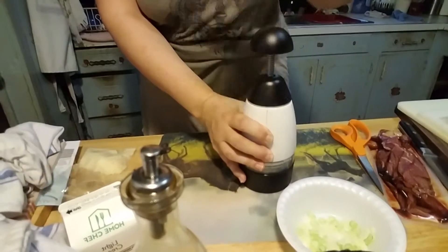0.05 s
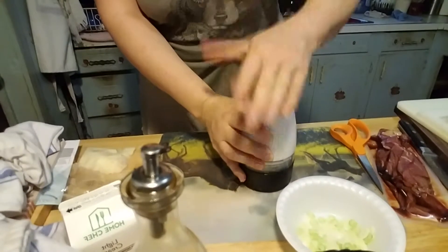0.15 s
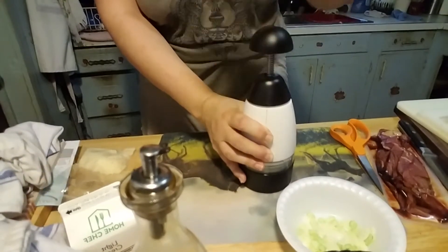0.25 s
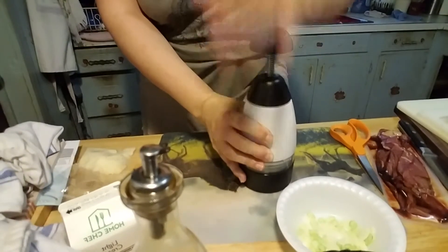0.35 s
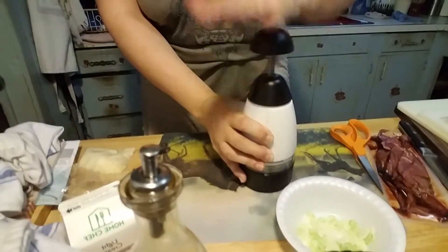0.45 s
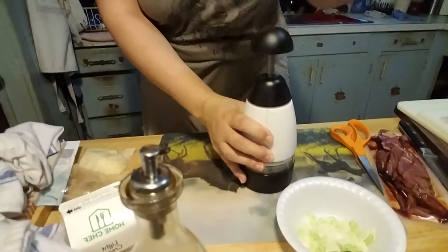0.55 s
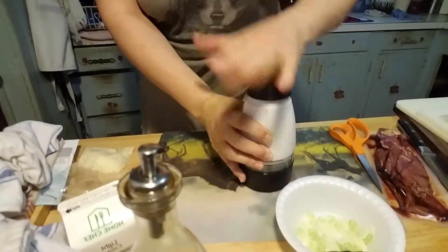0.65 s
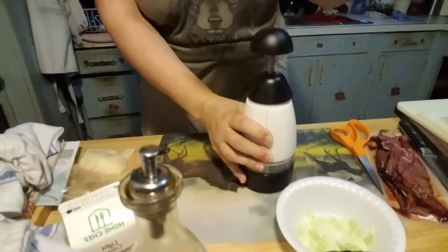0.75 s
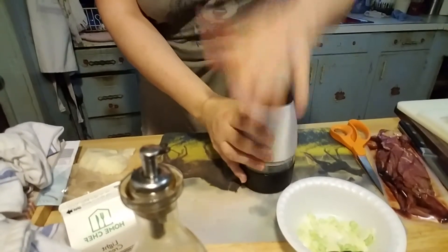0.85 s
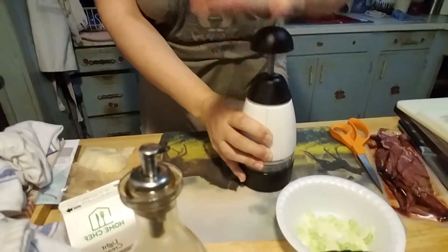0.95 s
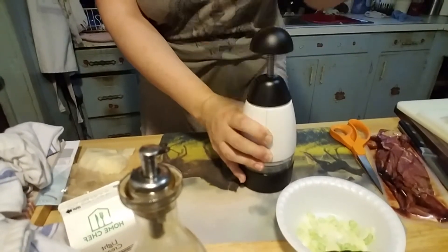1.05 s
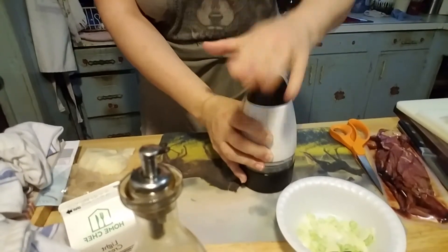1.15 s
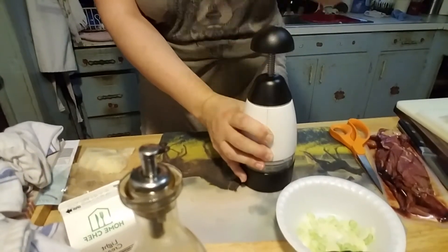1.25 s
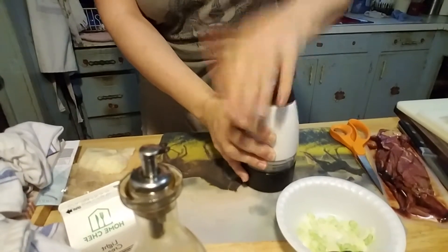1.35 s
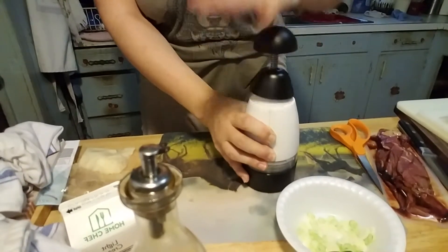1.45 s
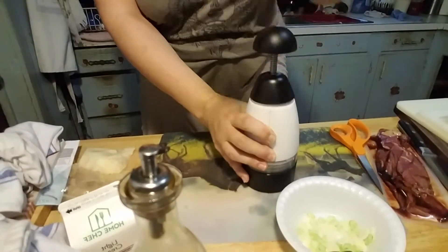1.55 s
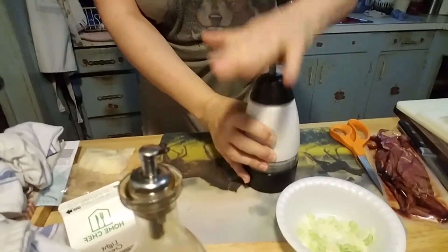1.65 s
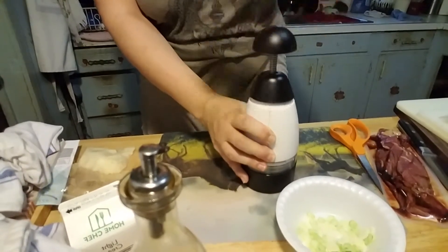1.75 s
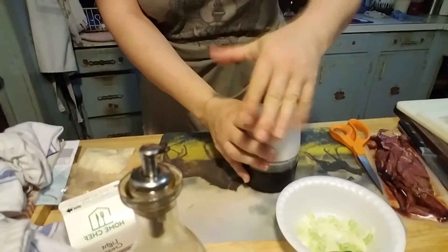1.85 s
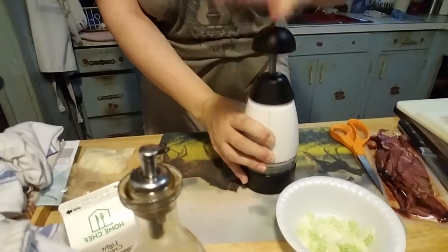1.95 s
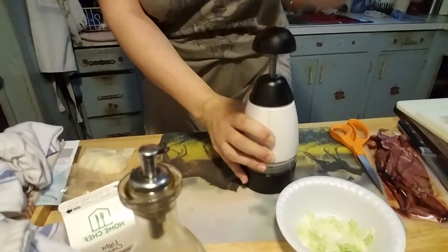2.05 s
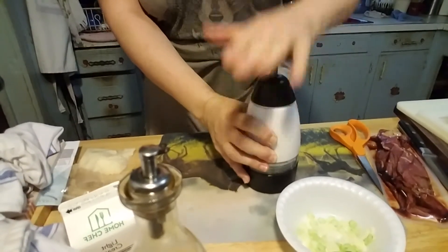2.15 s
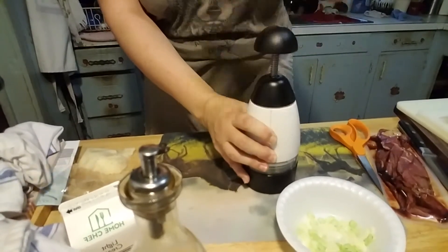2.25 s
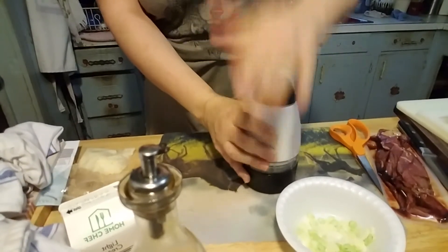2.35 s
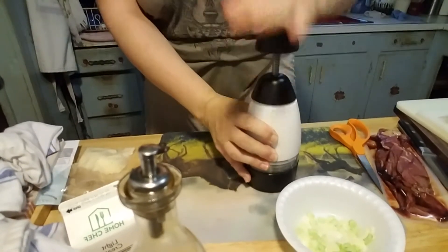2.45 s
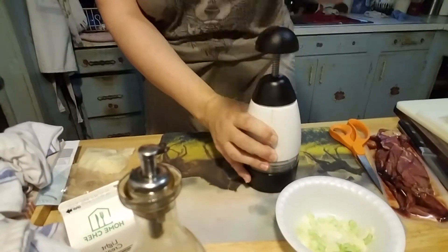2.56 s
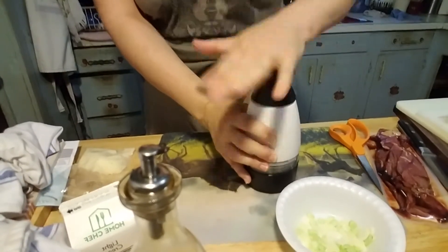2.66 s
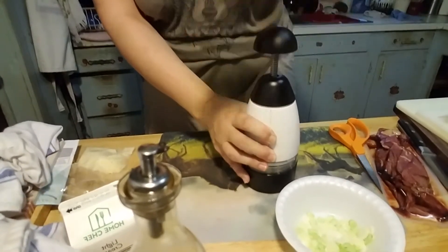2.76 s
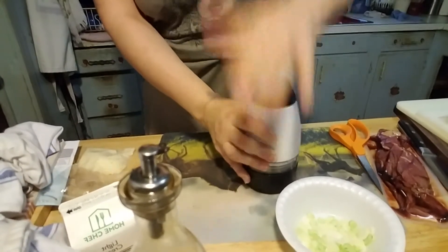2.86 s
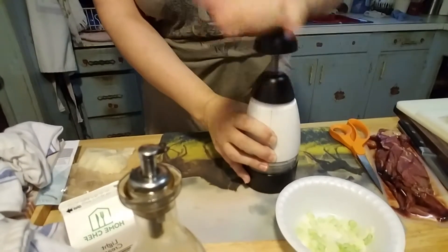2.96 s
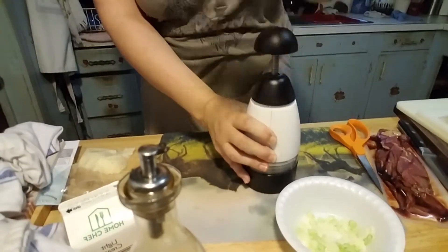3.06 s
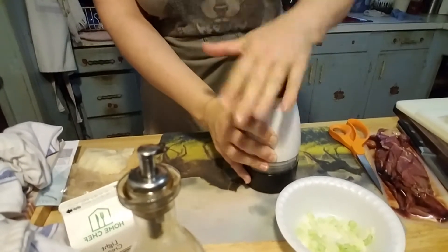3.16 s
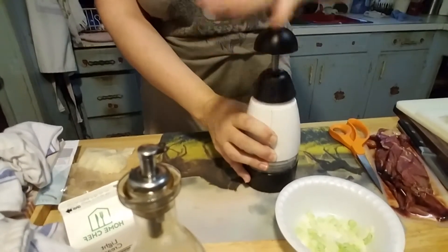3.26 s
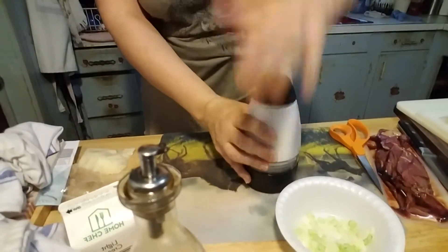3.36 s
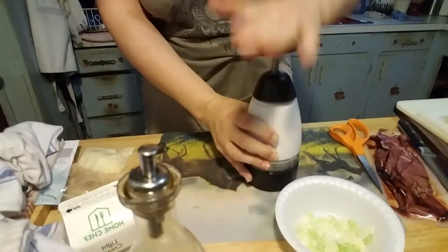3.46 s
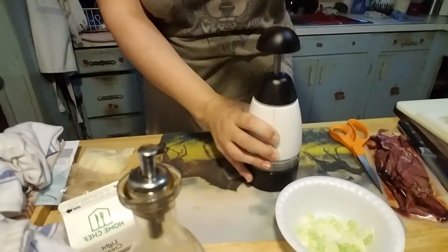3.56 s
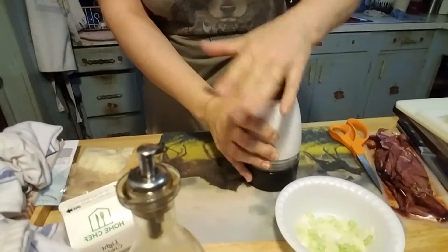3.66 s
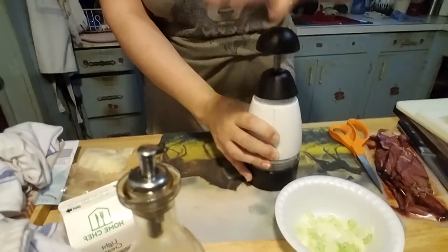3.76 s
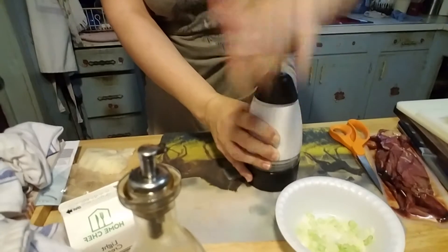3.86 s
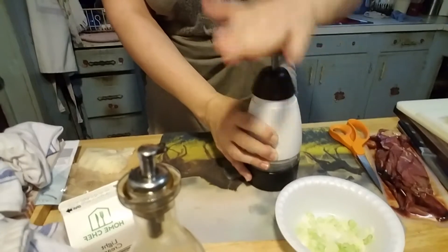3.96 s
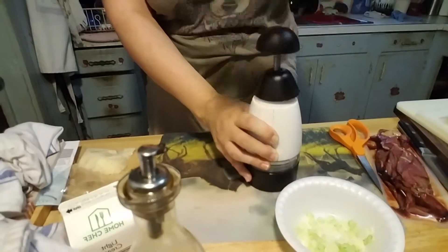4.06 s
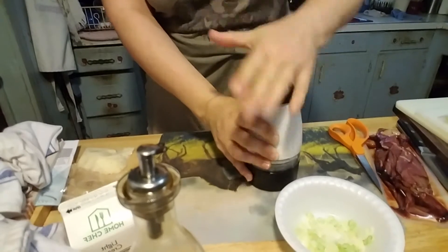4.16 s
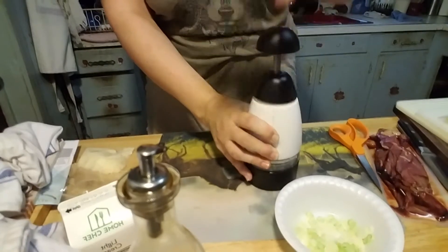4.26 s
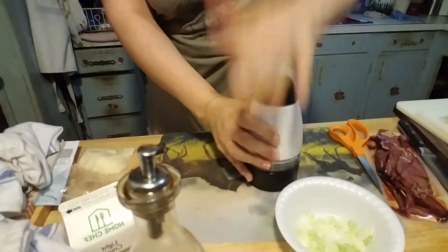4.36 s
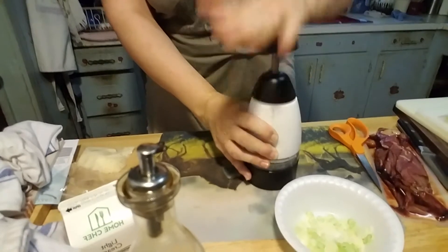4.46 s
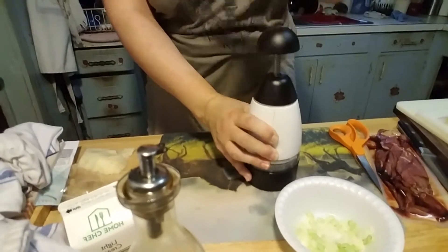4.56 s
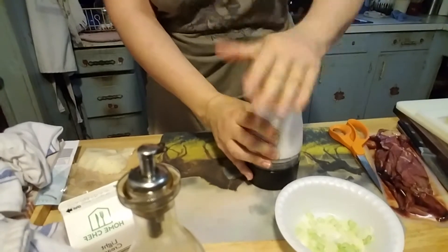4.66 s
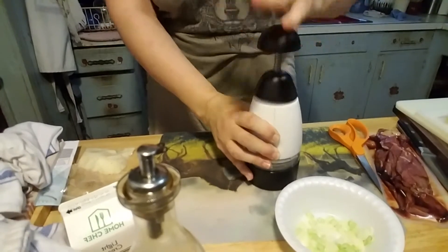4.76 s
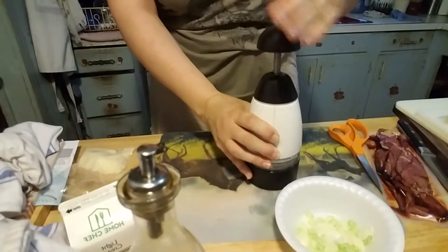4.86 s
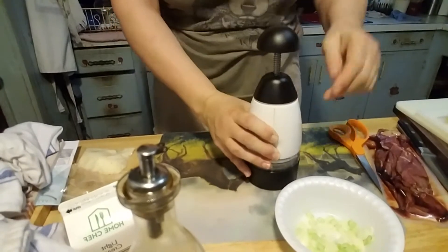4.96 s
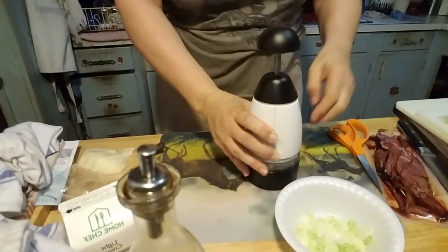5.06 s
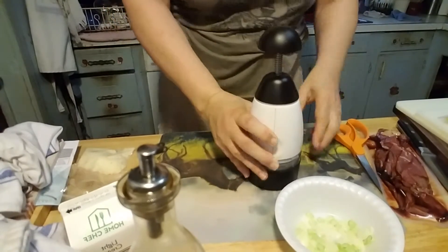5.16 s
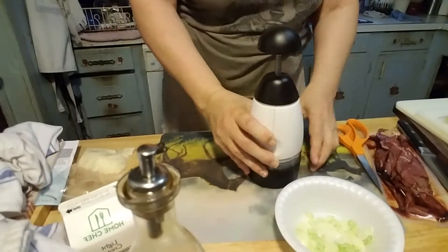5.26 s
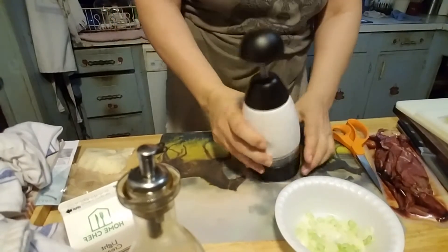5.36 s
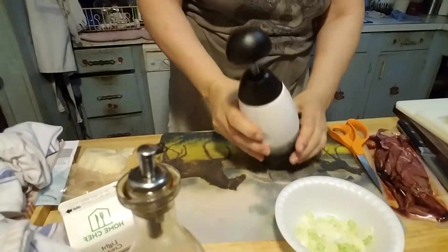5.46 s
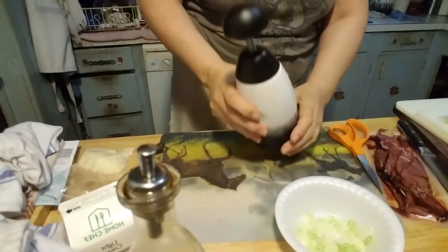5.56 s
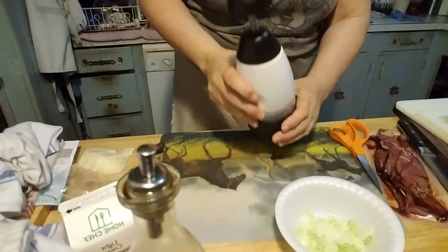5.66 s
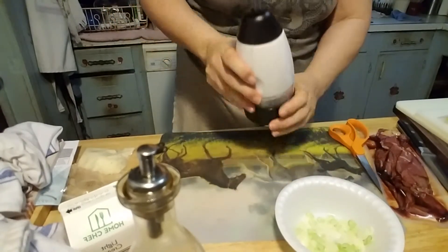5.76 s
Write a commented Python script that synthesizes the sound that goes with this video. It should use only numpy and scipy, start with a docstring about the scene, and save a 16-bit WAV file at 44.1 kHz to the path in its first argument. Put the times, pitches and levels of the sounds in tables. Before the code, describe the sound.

A plunger chopper clacks rapidly and evenly on a kitchen counter, its spring rattling back after each stroke, then stops.

```python
"""A spring plunger chopper, pumped four times a second on a kitchen counter, then left at rest.
Each stroke: the palm slaps the knob, the blades slam the base and shake the counter, and the spring
throws the rod back; the loose rod ticks in its guide. Heard close, on a two-port stereo microphone,
in a small hard kitchen that rings on. Once the blows stop, the gain control opens up on the room noise."""
import sys
import numpy as np
from scipy import signal
from scipy.fft import rfft, irfft
from scipy.io import wavfile
from scipy.ndimage import uniform_filter1d

SR = 44100
rng = np.random.default_rng(int(sys.argv[2]) if len(sys.argv) > 2 else 0)


def int16_out(signal):
    """Quantize to a 16-bit WAV file."""
    q = np.round(np.clip(np.atleast_2d(signal).T, -1, 1) * 32767)
    wavfile.write(sys.argv[1], SR, q.astype(np.int16))


N = 257103
BLOW_T = np.arange(SR // 3) / SR  # time axis of one blow, in seconds

# room noise spectrum: frequency_hz, density_db
ROOM_SPECTRUM = [(20, -65), (40, -46.5), (109, -6.5), (181, -15), (223, -21.5), (350, -8), (443, -19.5),
                 (713, -15), (1120, -20), (1840, -20), (3500, -30), (6000, -41), (10000, -44), (16000, -45)]
# likeness of the room noise at the two ports: frequency_hz, correlation
ROOM_COHERENCE = [(60, 0.94), (180, 0.87), (550, 0.95), (1650, 0.22), (4970, 0.01), (15000, -0.15)]
# loose rod in its guide: start_s, clack_db, tick_db
ROD_TICKS = [(-0.012, -34.5, -38), (0.016, -50, -52), (0.032, -52, -51), (0.7206, -41, -43),
             (0.746, -34.5, -49), (0.7567, -43, -49), (1.276, -31, -45), (1.457, -39, -47),
             (1.478, -37, -43.5), (1.501, -36, -46), (2.935, -38, -45), (2.9772, -41, -38),
             (3.0112, -34, -42), (3.1554, -30, -42), (3.2063, -30, -42), (3.234, -40, -46),
             (3.2612, -33, -46.5), (3.482, -34, -37), (3.4966, -29, -37), (3.668, -30, -37),
             (3.695, -44, -43.5), (3.7368, -26, -33.5), (3.929, -38, -39), (3.946, -40, -40),
             (3.9782, -40, -37.5), (3.9994, -33.5, -37), (4.023, -25.5, -35.5), (4.221, -44, -45.5),
             (4.4782, -33.5, -44.5), (4.6887, -30.5, -53), (4.7264, -43.5, -56.5), (5.028, -41.5, -59.5),
             (5.3594, -55, -61), (5.3744, -52, -53), (5.388, -47, -57)]
# palm on the knob: start_s, clack_db, tick_db
PALM_SLAPS = [(0.0578, -19, -52), (0.2991, -8, -20), (0.5432, -15, -28), (0.7838, -14.5, -23),
              (1.0282, -16, -29), (1.2827, -32, -48), (1.525, -15, -27), (1.7648, -18, -42),
              (2.0141, -22.5, -37), (2.286, -25, -32), (2.5303, -24, -32), (2.7877, -26, -46),
              (3.0353, -18, -30), (3.2951, -33, -43), (3.5389, -20.5, -23), (3.7974, -14, -19),
              (4.04, -18.5, -23), (4.2871, -19.5, -23), (4.5634, -18.5, -23)]
# blades on the base: start_s, clack_db, pitch_hz, thump_db, knock_db, tick_db, scrape_db
BLADE_CHOPS = [(0.077, 3.5, 1610, -16.5, -3, -36, -36), (0.3141, -1.5, 1570, -11.5, -2.5, -21, -35.5),
               (0.5604, 0.5, 1730, -12, -1, -29, -33), (0.8004, 2, 1720, -10.5, -1.5, -13.5, -28.5),
               (1.0496, -1.5, 1810, -6.5, -4.5, -30, -33), (1.3007, -5.5, 1605, -3, -8, -22, -32),
               (1.5426, -3, 1730, -4.5, -4.5, -15, -25), (1.7872, -0.5, 1480, -6.5, -6, -18, -29),
               (2.0371, -8, 1600, -9.5, -14, -17.5, -32), (2.3064, -5.5, 1580, -21, -10.5, -11.5, -33),
               (2.5538, 1.5, 1480, -15, 0.5, -14.5, -30), (2.806, -1.5, 1610, -14.5, -4, -21, -26.5),
               (3.056, -1.5, 1640, -16.5, -6.5, -21, -37), (3.3146, -2, 1620, -17.5, -9, -29, -40),
               (3.5601, 2, 1740, -14.5, -2.5, -18, -33), (3.817, 1, 1630, -16.5, -4.5, -27, -32),
               (4.0592, 0.5, 1650, -12.5, -4, -20.5, -35), (4.3069, 0.5, 1890, -10.5, -2.5, -16, -28),
               (4.582, 0, 1810, -7.5, -5, -13, -32.5)]
# rod thrown against its stop: start_s, clack_db, knock_db, tick_db
SPRING_RETURNS = [(0.134, -9.5, -15.5, -21), (0.3758, -8, -18, -22.5), (0.623, -10, -19.5, -24.5),
                  (0.8666, -8, -15, -31.5), (1.1161, -8, -15, -23.5), (1.366, -11, -15.5, -21.5),
                  (1.6116, -8.5, -17, -22.5), (1.8566, -9.5, -14, -29), (2.1094, -19, -16.5, -33.5),
                  (2.374, -13.5, -23.5, -29.5), (2.6338, -13, -12.5, -24), (2.8821, -15.5, -19.5, -23.5),
                  (3.1464, -32, -20.5, -28), (3.3905, -16, -14.5, -23.5), (3.6427, -19, -16, -26.5),
                  (3.8941, -11, -15.5, -25), (4.1384, -8.5, -17, -23), (4.3836, -9, -15, -28.5),
                  (4.6501, -9, -16, -25)]
# modes of the cup, the spring and the counter (knock, deep thump): pitch_hz, level_db, t60_s
CUP_MODES = [(1027, -25, 0.0073), (1286, -1.5, 0.029), (1476, 9.5, 0.0086), (1643, -5, 0.052),
             (1807, 6.5, 0.025), (2160, 8.5, 0.005), (2703, -3.5, 0.015), (2849, 8.5, 0.011),
             (3275, 2, 0.023), (3690, -6.5, 0.024), (4640, -7, 0.011)]
SPRING_MODES = [(1860, 0, .16), (362, -3, .2)]
KNOCK_MODES = [(190, -9, .025), (254.5, -4, 0.036), (303.5, -4, .025), (339.6, -3, 0.034),
               (451, -0.5, .025), (524.6, -2, 0.021), (586, -1, 0.03), (646.7, -1.5, 0.019),
               (770, -4.5, 0.02), (871, -0.5, 0.026)]
THUMP_MODES = [(101.3, 7, 0.089), (147.1, 1, 0.075), (218, -5, 0.045)]
# spectrum of metal tick and rod scrape: frequency_hz, density_db
RATTLE_SPECTRUM = [(1500, -1.5), (3500, -4), (5000, -4), (6500, -6.5), (8500, -3), (10500, -6.5),
                   (13000, -3.5), (15500, -5)]
# decay of the kitchen's echo: frequency_hz, t60_s
KITCHEN_DECAY = [(80, 0.24), (500, 0.19), (2000, 0.22), (5000, 0.24), (15000, 0.26)]


def gain_of(db):
    """Decibels to amplitude."""
    return 10 ** (np.asarray(db) / 20)


def unit_rms(x):
    """Scales to rms 1."""
    return x / np.sqrt(np.mean(x ** 2) + 1e-20)


def curve_at(points, hz):
    """Reads a table on a log-frequency axis."""
    table_hz, value = np.transpose(points)
    return np.interp(np.log(hz + 1), np.log(table_hz + 1), value)


def add(mix, start_s, sound):
    """Mixes in a stereo sound; what lies before zero is lost."""
    at = round(start_s * SR)
    sound = sound[:, max(-at, 0):]
    part = mix[:, max(at, 0):][:, :sound.shape[1]]
    part += sound[:, :part.shape[1]]


def room_noise():
    """Steady room tone with slightly drifting patches; its bass is nearly alike at both ports."""
    frames, hz = N // 256 + 5, np.fft.rfftfreq(1024, 1 / SR)
    a, b, c, d, patches = rng.standard_normal((frames, 513, 5)).T
    patches = unit_rms(uniform_filter1d(uniform_filter1d(patches, size=10, axis=0), size=12, axis=1))
    likeness = np.clip(curve_at(ROOM_COHERENCE, hz), -1, 1)[:, None]
    left = a + 1j * b
    right = likeness * left + np.sqrt(1 - likeness ** 2) * (c + 1j * d)
    spectra = np.array([left, right]) * gain_of(curve_at(ROOM_SPECTRUM, hz)[:, None] + 2 * patches)
    noise = signal.istft(spectra, nperseg=1024, noverlap=768)[1][:, :N]
    return unit_rms(noise) * gain_of([[-1.4], [1.4]])


def ring(modes, spread_db, phase_rad):
    """Decaying modes, varied as strike point and grip change; each port hears its own phase."""
    hz, db, t60 = np.transpose(modes)[:, :, None]
    luck, skew, detune = rng.standard_normal((3, len(modes), 1))
    phase = 2 * np.pi * hz * (1 + .025 * detune) * BLOW_T
    polarity = (-1.) ** (1 + np.arange(len(modes))[:, None] // 2)
    fade = polarity * gain_of(db + spread_db * luck - 60 * BLOW_T / t60)
    pair = np.array([(fade * np.sin(phase + side * phase_rad * skew)).sum(0) for side in (1, -1)])
    return pair / abs(pair).max()


def metal_grit(touches):
    """Bright noise of the rod rubbing, louder where small contacts crowd."""
    noise = rng.standard_normal((3, len(touches)))
    grit = (noise[:2] + .55 * noise[2]) * (.5 + 14 * uniform_filter1d(abs(touches), size=60))
    colour = gain_of(curve_at(RATTLE_SPECTRUM, np.fft.rfftfreq(len(touches), 1 / SR)))
    return unit_rms(irfft(rfft(grit) * colour, len(touches)))


def blow(mix, start_s, clack_db, *, pitch_hz, thump_db, knock_db, tick_db, scrape_db,
         chatter_rel_db, cup_rel_db, bounce_rel_db, upper_rel_db, retick_rel_db,
         clack_t60, chatter_t60, scrape_t60, lead_s, counter_lag_s, tick_rise_s):
    """A hard contact, a bounce and dying chatter ring cup, spring and counter; the rod scrapes on."""
    t = BLOW_T
    touches = rng.standard_normal((3, len(t))) * (rng.random((3, len(t))) < 2500 / SR)
    chatter = touches[0] + .5 * touches[1:]  # spread over the parts, so unlike at the two ports
    contacts = chatter * gain_of(chatter_rel_db - 60 * t / chatter_t60)
    main, bounce = round(lead_s * SR), round(rng.uniform(.007, .0088) * SR)
    contacts[:, :main] *= np.linspace(0, 1, main)  # the chatter swells just before the main contact
    contacts[:, main] = 1
    contacts[:, main + bounce] = gain_of(bounce_rel_db)

    struck_spot = [(pitch_hz, 0, clack_t60), (.69 * pitch_hz, -7, .006),
                   (1.683 * pitch_hz, upper_rel_db, .006)]
    clack = gain_of(clack_db) * ring(struck_spot, spread_db=1.5, phase_rad=.5)
    cup = ring(CUP_MODES, 1.5, 1.31)
    spring = gain_of(-26.5) * ring(SPRING_MODES, 3, .23)
    housing = gain_of(clack_db + cup_rel_db) * (cup + spring)
    rise = 1 - np.exp(-(t / counter_lag_s) ** 2)  # the heavy counter builds up later than the cup
    knock = gain_of(knock_db) * ring(KNOCK_MODES, 2, .4) * rise
    thump = gain_of(thump_db) * ring(THUMP_MODES, 2, .2) * np.sqrt(rise)
    body = signal.fftconvolve(.56 * clack + housing + knock, contacts, axes=1)[:, :len(t)]
    body += .38 * np.roll(clack, main, axis=1)  # mostly the main contact rings the spot

    grit = metal_grit(touches[0])
    slips = unit_rms(uniform_filter1d(rng.standard_normal(len(t)), size=260))  # the rod sticks and slips
    scrape = gain_of(scrape_db + 2.62 * slips - 60 * t / scrape_t60) * np.minimum(t / lead_s, 1)
    since_s = np.maximum(t - lead_s, 0)
    tick = gain_of(tick_db - 60 * since_s / .015) * (1 - np.exp(-since_s / tick_rise_s))
    tick += gain_of(retick_rel_db) * np.roll(tick, bounce)  # the metal ticks again at the bounce
    bodies, rattles = mix
    add(bodies, start_s - lead_s, body + thump)
    add(rattles, start_s - lead_s, grit * (tick + scrape))


def placed(source, right_db):
    """Plays a source with its ringing louder at the right port; its rattle stays centred."""
    bodies, rattles = mix = np.zeros((2, 2, N))
    source(mix)
    return bodies * gain_of([[-right_db / 2], [right_db / 2]]) + rattles


def rod_ticks(mix):
    """The loose rod taps its guide, barely stirring the counter."""
    for start_s, clack_db, tick_db in ROD_TICKS:
        blow(mix, start_s, clack_db, pitch_hz=1840,
             thump_db=clack_db - 28, knock_db=clack_db - 18, tick_db=tick_db, scrape_db=tick_db - 1,
             chatter_rel_db=-9.5, cup_rel_db=-9.5, bounce_rel_db=-5, upper_rel_db=-7, retick_rel_db=-20,
             clack_t60=.023, chatter_t60=.046, scrape_t60=.093,
             lead_s=.0025, counter_lag_s=.00315, tick_rise_s=.0027)


def palm_slaps(mix):
    """The palm lands on the knob: a light clack with little bounce."""
    for start_s, clack_db, tick_db in PALM_SLAPS:
        blow(mix, start_s, clack_db, pitch_hz=2457,
             thump_db=clack_db - 23, knock_db=clack_db - 3, tick_db=tick_db, scrape_db=-34.5,
             chatter_rel_db=-28.5 - clack_db, cup_rel_db=-5, bounce_rel_db=-19.5, upper_rel_db=-31,
             retick_rel_db=-26, clack_t60=.015, chatter_t60=.1, scrape_t60=.32,
             lead_s=.0025, counter_lag_s=.0048, tick_rise_s=.0015)


def blade_chops(mix):
    """The blades slam the base and shake the counter."""
    for start_s, clack_db, pitch_hz, thump_db, knock_db, tick_db, scrape_db in BLADE_CHOPS:
        blow(mix, start_s, clack_db, pitch_hz=pitch_hz,
             thump_db=thump_db, knock_db=knock_db, tick_db=tick_db, scrape_db=scrape_db,
             chatter_rel_db=-16.5 - clack_db, cup_rel_db=-3, bounce_rel_db=-7.5, upper_rel_db=-10,
             retick_rel_db=-17.5, clack_t60=.0061, chatter_t60=.23, scrape_t60=.34,
             lead_s=.000997, counter_lag_s=.0041, tick_rise_s=.00017)


def spring_returns(mix):
    """The spring throws the rod against its stop; the thump scales with that of the same stroke's chop."""
    for (start_s, clack_db, knock_db, tick_db), chop in zip(SPRING_RETURNS, BLADE_CHOPS):
        blow(mix, start_s, clack_db, pitch_hz=2480,
             thump_db=chop[3] - 12.5, knock_db=knock_db, tick_db=tick_db, scrape_db=tick_db - 8.5,
             chatter_rel_db=-15.5, cup_rel_db=-5, bounce_rel_db=-9.5, upper_rel_db=-25.5,
             retick_rel_db=-11.5, clack_t60=.0076, chatter_t60=.18, scrape_t60=.19,
             lead_s=.0015, counter_lag_s=.0042, tick_rise_s=.0029)


def echo_pattern():
    """Sparse reflections of random sign, each band dying at its own speed, over a fainter longer tail."""
    taps = np.zeros((2, SR))
    at = np.arange(200, SR - 20, 20) + rng.integers(0, 20, (2, (SR - 201) // 20))
    np.put_along_axis(taps, at, rng.choice([-1., 1.], at.shape), 1)
    taps[1] = .5 * taps[0] + .63 * taps[1]
    hz, t, spectra = signal.stft(taps, SR, nperseg=256)
    fade = gain_of(-60 * t / curve_at(KITCHEN_DECAY, hz)[:, None]) + gain_of(-16 - 60 * t / .58)
    tail = signal.istft(spectra * fade, SR, nperseg=256)[1]
    return tail / np.linalg.norm(tail[0])


def kitchen_echo(direct, blend_hz=1.37):
    """The kitchen's echo, cycling through three patterns so successive blows ring differently."""
    turn = 2 * np.pi * blend_hz * np.arange(N) / SR
    blends = [np.sqrt(2 / 3) * np.cos(turn + k * 2 * np.pi / 3) for k in range(3)]
    return sum(signal.fftconvolve(direct * blend, echo_pattern(), axes=1)[:, :N] for blend in blends)


def scene():
    """At the microphone: the chopper a little to the right, the kitchen's echo and the room noise."""
    chopper = placed(palm_slaps, right_db=1.5) + placed(blade_chops, right_db=2.2)
    chopper += placed(spring_returns, right_db=3.5) + placed(rod_ticks, right_db=5.5)
    return chopper + gain_of(-9.5) * kitchen_echo(chopper) + gain_of(-55) * room_noise()


def record(dry):
    """Microphone bass cut, gain control that holds after loud moments then opens, clipping, band limit."""
    dry = signal.sosfilt(signal.butter(2, 66, "highpass", fs=SR, output="sos"), dry)
    power_db = 10 * np.log10(abs(uniform_filter1d((dry ** 2).mean(0), size=400)) + 1e-12)
    t = np.arange(N) / SR
    loud_db, hold_s, opening_s = -30, .45, .36
    quiet_s = t - np.maximum.accumulate(t * (power_db > loud_db))
    boost_db = 14 * (1 - np.exp(-(np.maximum(quiet_s - hold_s, 0) / opening_s) ** 1.67))
    clipped = np.clip(dry * gain_of(boost_db), -1, 1)
    lowpass = signal.firwin(511, 15900, window=("kaiser", 9), fs=SR)
    return signal.oaconvolve(clipped, lowpass[None], "same")


dry = scene()
out = record(dry)
int16_out(out)
```